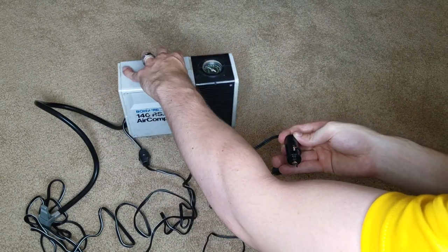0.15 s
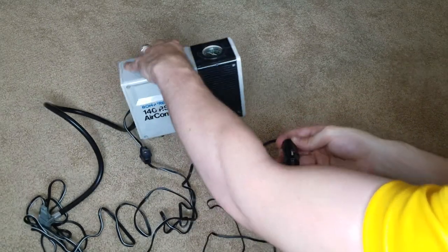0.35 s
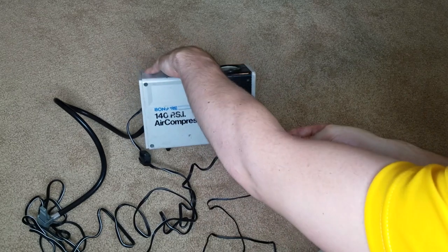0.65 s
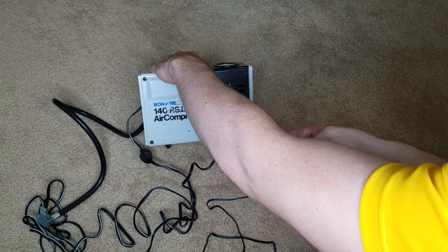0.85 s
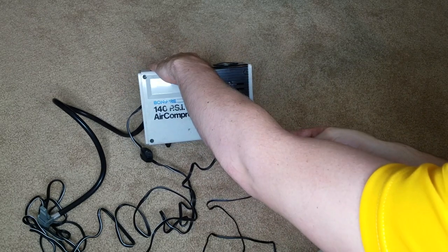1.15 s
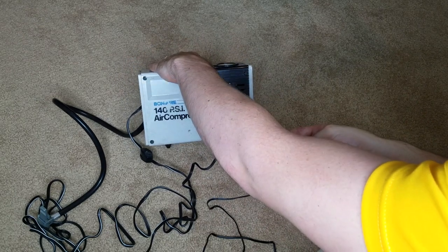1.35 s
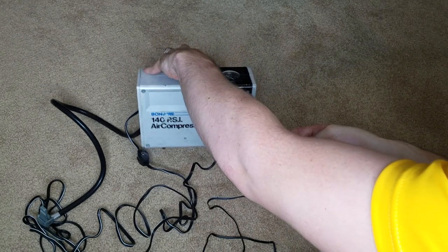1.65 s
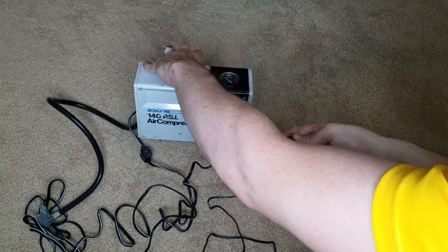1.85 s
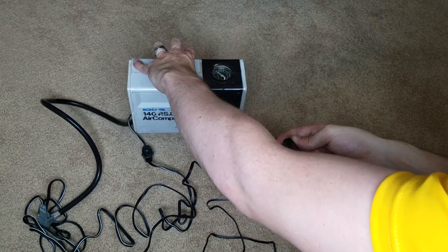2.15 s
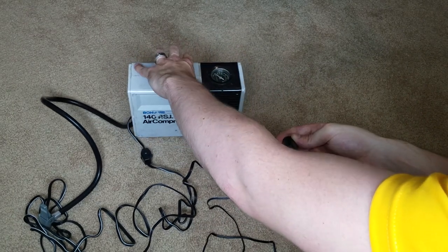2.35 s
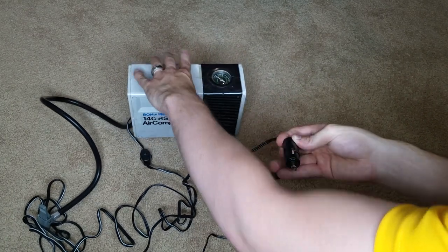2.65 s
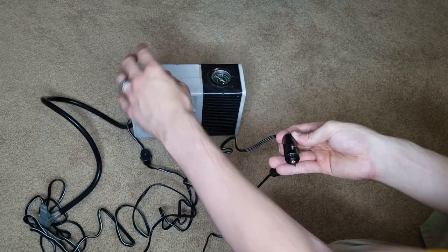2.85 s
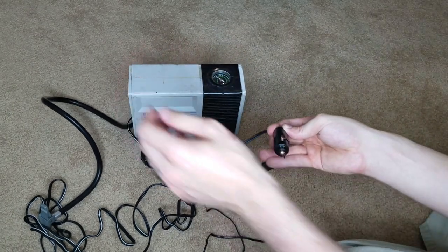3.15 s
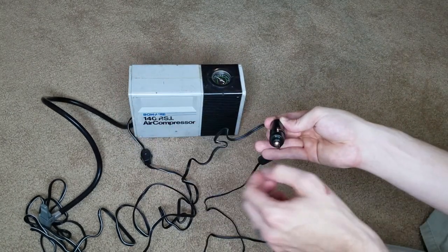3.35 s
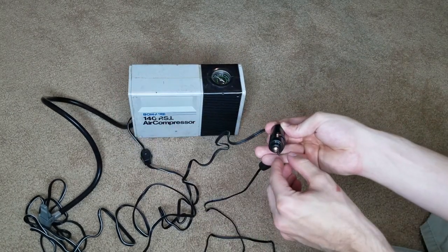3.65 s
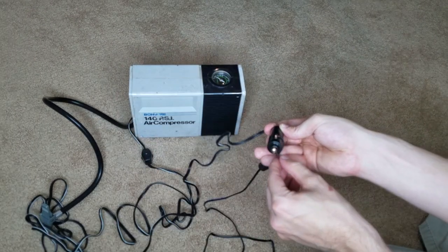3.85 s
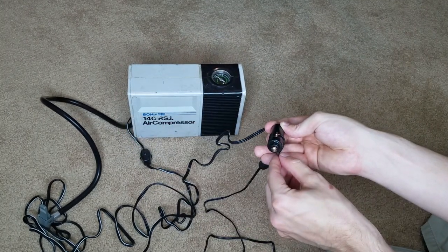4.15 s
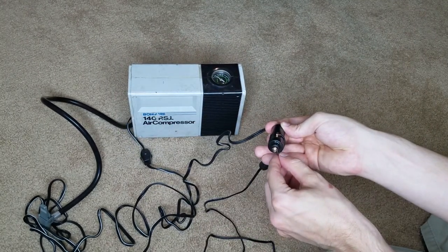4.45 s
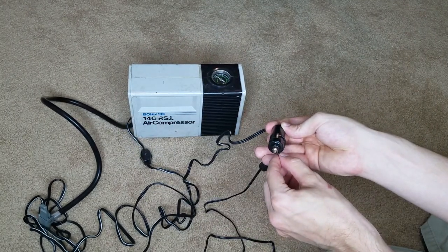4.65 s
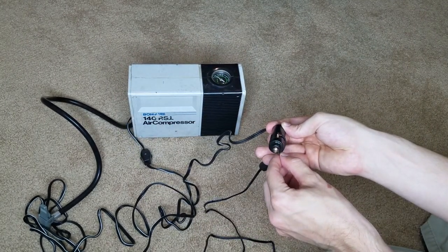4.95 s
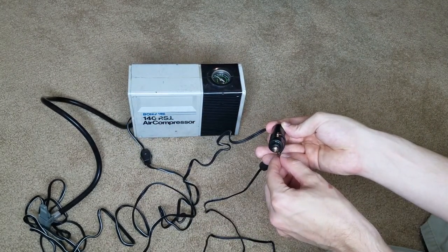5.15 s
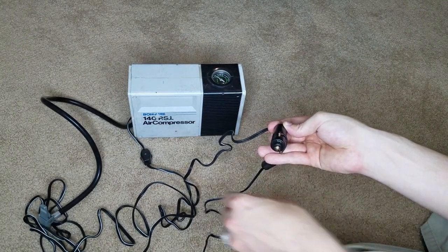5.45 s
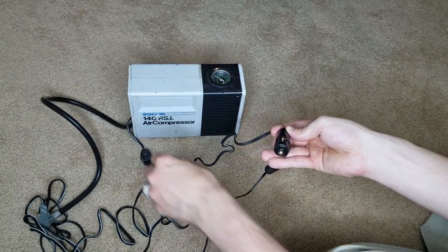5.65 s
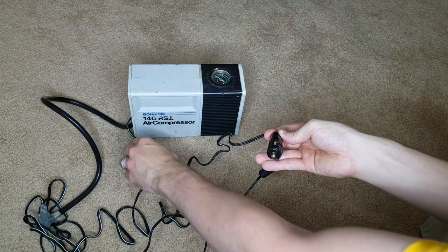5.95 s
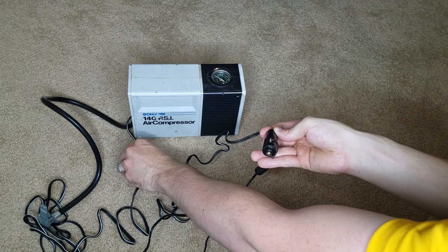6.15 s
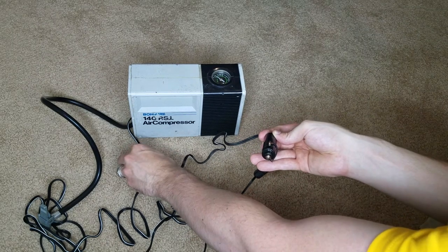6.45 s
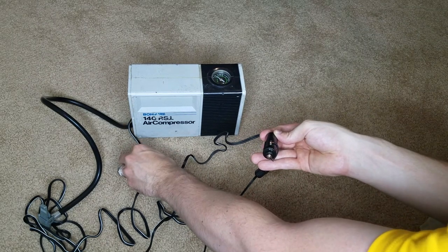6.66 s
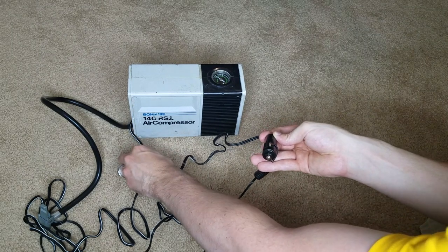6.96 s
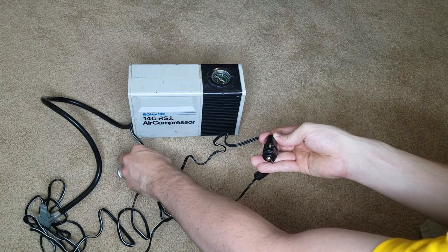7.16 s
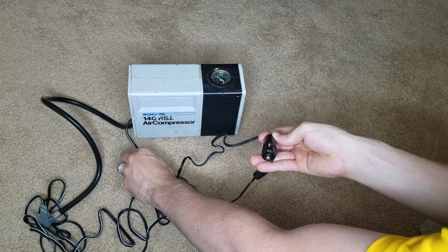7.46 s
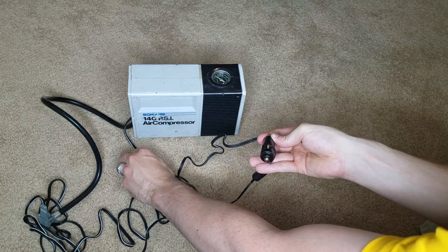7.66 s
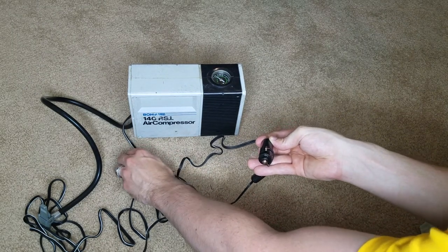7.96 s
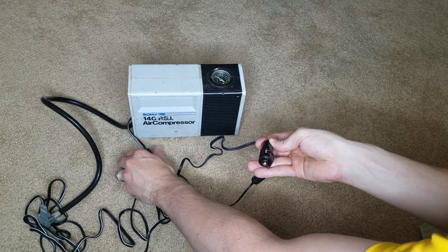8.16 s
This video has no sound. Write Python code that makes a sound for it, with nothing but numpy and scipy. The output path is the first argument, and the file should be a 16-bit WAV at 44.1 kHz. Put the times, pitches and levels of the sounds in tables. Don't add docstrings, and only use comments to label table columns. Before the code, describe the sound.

A small air compressor is switched on for an instant again and again, each burst a rattling, slowing chug over low hum in a carpeted room.

```python
import sys
import numpy as np
from scipy import signal
from scipy.io import wavfile

SR = 44100
rng = np.random.default_rng(int(sys.argv[2]) if len(sys.argv) > 2 else 0)


def generate_wav(sig):
    pcm = np.round(np.clip(np.atleast_2d(sig).T, -1, 1) * 32767).astype(np.int16)
    wavfile.write(sys.argv[1], SR, pcm)


def attenuation_scalar(level_db):
    decades = np.asarray(level_db, float) / 20
    return 10 ** decades


N = 366471


def rms_one(x):
    return x / np.sqrt(np.mean(x ** 2) + 1e-20)


def at_hz(points, hz):
    table_hz, values = np.transpose(points)
    return np.interp(np.log(hz), np.log(table_hz), values)


def drift(rate_hz):
    r = np.exp(-2 * np.pi * rate_hz * 40 / SR)
    settle = 4000
    noise = rng.standard_normal(N // 40 + settle + 2)
    slow = signal.lfilter([1], [1, -2 * r, r * r], noise)[settle:]
    return np.interp(np.arange(N) / 40, np.arange(len(slow)), rms_one(slow - slow.mean()))


def resonate(x, hz, width_hz):
    r = np.exp(-np.pi * width_hz / SR)
    zeros = np.array([1, 0, -1]) * (1 - r * r) / 2
    return signal.lfilter(zeros, [1, -2 * r * np.cos(2 * np.pi * hz / SR), r * r], x)


# (frequency [Hz], left minus right [dB])
BALANCE_DB = [(60, -1.5), (180, -3.5), (550, -0.5), (1650, -1), (4970, 1.5), (15000, 2)]


def spread(pair, hz, likeness):
    alike = np.clip(at_hz(likeness, hz), -1, 1)
    shared = np.sqrt(1 + alike) * pair[0]
    opposed = np.sqrt(1 - alike) * pair[1] * [[1], [-1]]
    return (shared + opposed) * attenuation_scalar(at_hz(BALANCE_DB, hz) * np.array([[.5], [-.5]]))


def bands(source, spectrum, likeness, patchy_db, rate_hz):
    first, last = spectrum[0][0], 1.07 * spectrum[-1][0]
    edges = np.geomspace(first, last, int(3 * np.log2(last / first)))
    out = 0
    for k, (low, high) in enumerate(zip(edges, edges[1:])):
        band_pass = signal.butter(2, [low, high], "band", fs=SR, output="sos")
        band = signal.sosfilt(band_pass, source[k % 2])
        hz = np.sqrt(low * high)
        gain = attenuation_scalar(at_hz(spectrum, hz) + patchy_db * drift(rate_hz))
        out = out + gain * spread(band, hz, likeness)
    return out


# (time [s], level [dB])
FAN_LEVEL = [
    (0, -45.5),
    (1.25, -54),
    (1.5, -72),
    (1.95, -45),
    (2.6, -58),
    (3.5, -52),
    (5.8, -53.5),
    (6.9, -49.5),
    (8.31, -50),
]
# (frequency [Hz], width [Hz], level [dB rms])
DUCT_MODES = [
    (57.7, 2.1, -59.5),
    (142.8, 6.7, -53.5),
    (199, 4.8, -56.5),
]
# (frequency [Hz], level [dB per Hz])
ROOM_TONE = [(25, -41), (45, -18), (70, -15.5), (150, -14), (230, -15), (320, -18), (450, -24.5),
             (1000, -26.5), (2000, -36.5), (4000, -49.5), (7000, -61.5), (9500, -57), (12500, -54.5),
             (15800, -48)]
# (frequency [Hz], left-right likeness [-1 to 1])
FAR_LIKENESS = [(40, 0.91), (180, 1), (320, 0.9), (640, 0.48), (1400, 0.54), (3100, 0.026), (6800, .01)]


def background():
    t = np.arange(N) / SR
    hum = attenuation_scalar(-43 + 0.9 * drift(0.37)) * np.sin(2 * np.pi * 120.4 * t)

    fan_hz = 95.56 + 0.44 * drift(1.14)
    fan_db = np.interp(t, *np.transpose(FAN_LEVEL)) + 2.5 * drift(3.8)
    fan = attenuation_scalar(fan_db) * np.sin(2 * np.pi * np.cumsum(fan_hz) / SR)

    ducts = sum(attenuation_scalar(db) * rms_one(resonate(rng.standard_normal(N), hz, width))
                for hz, width, db in DUCT_MODES)
    hiss = rng.standard_normal((2, 2, N))
    floor = rms_one(bands(hiss, ROOM_TONE, FAR_LIKENESS, patchy_db=1.0, rate_hz=4.3))
    tones = np.sqrt(2) * (hum + fan) + ducts
    return tones * attenuation_scalar([[-.55], [.55]]) + attenuation_scalar(-48.5) * floor


def room(x):
    bass_t60_s, treble_t60_s = 0.33, 0.31
    t = np.arange(SR // 2) / SR
    noise = rng.standard_normal((2, len(t))) * (1 - np.exp(-t / 0.0025))
    long_waves = signal.butter(2, 600, fs=SR, output="sos")
    noise[1] += signal.sosfilt(long_waves, noise[0] - noise[1])
    bass = signal.sosfilt(signal.butter(1, 2500, fs=SR, output="sos"), noise)
    tail = bass * attenuation_scalar(-60 * t / bass_t60_s) + (noise - bass) * attenuation_scalar(-60 * t / treble_t60_s)
    tail = tail / np.sqrt(np.sum(tail ** 2, axis=1, keepdims=True))
    return signal.fftconvolve(x, tail, axes=1)[:, :N]


# (left lag [ms], right lag [ms], level [dB])
ECHOES = [
    (.3, .2, -11),
    (.7, .9, -11),
    (3.6, 2.9, -14),
]


def first_echoes(x):
    out, n = x.copy(), np.arange(N)
    for left_ms, right_ms, db in ECHOES:
        for side, ms in enumerate((left_ms, right_ms)):
            out[side] += attenuation_scalar(db) * np.interp(n - ms * SR / 1000, n, x[side], left=0)
    return out


# (time [s], hold [s], level [dB])
RUSTLE = [
    (2.885, 0.037, -64),
    (5.33, 0.22, -62),
]


def sleeve():
    attack_s, release_s = .025, 0.055
    t, level = np.arange(N) / SR, np.zeros(N)
    for s, hold_s, db in RUSTLE:
        corners = np.cumsum([s, attack_s, hold_s, release_s])
        level += attenuation_scalar(db) * np.interp(t, corners, [0, 1, 1, 0])
    soft = signal.butter(1, 7000, fs=SR, output="sos")
    return level * signal.sosfilt(soft, rng.standard_normal((2, N)))


# (time [s], crack peak [dB], knock [dB], t60 [s])
CLICKS = [
    (0.62, -35, -62, 0.055),
    (1.3825, -42, -54, 0.079),
    (2.372, -41, -56, 0.048),
    (2.818, -50, -76, 0.048),
    (8.043, -36.5, -61, 0.071),
    (8.0694, -42, -44.5, 0.055),
    (8.0889, -41, -74, 0.067),
    (8.2865, -60, -71, 0.043),
]


def fingers():
    crack, knock = np.zeros(N), np.zeros(N)
    for s, crack_db, knock_db, t60 in CLICKS:
        start = round(s * SR)
        t = np.arange(min(SR // 10, N - start)) / SR
        fall = attenuation_scalar(-60 * t / max(t60, .005))
        onset = 1 - np.exp(-t / 0.0004)
        crack[start:start + len(t)] += attenuation_scalar(crack_db - 21.0) * fall * onset
        knock[start:start + len(t)] += attenuation_scalar(knock_db + 25.0) * fall
    bright = signal.butter(2, 2500, "high", fs=SR, output="sos")
    cracks = crack * rng.standard_normal((2, N))
    thud = resonate(resonate(knock * rng.standard_normal(N) + 1e-18, 520, 300), 560, 300)
    return signal.sosfilt(bright, cracks + attenuation_scalar(-3.5) * sleeve()) + thud


# (hardest stroke [s], crank speed there [turns/s], first stroke before it [ms], switch-on before that [ms])
KICKS = [
    (-.111, 22.15, 48, 20),
    (.7429, 23.3, 40.5, 8),
    (1.6284, 21.0, 49.3, 24),
    (2.4705, 21.76, 49.2, 15),
    (3.3198, 23.5, 34.7, 19.6),
    (4.2035, 20.7, 50.5, 31.5),
    (5.048, 21.8, 45.2, 26),
    (5.8888, 23.0, 32.8, 21),
    (6.774, 20.7, 47, 43),
    (7.616, 21.64, 49.7, 25.7),
]
# (switch-on jolt [dB], first stroke [dB], hardest stroke [dB])
KICK_DB = [(-50, -36, -27.5), (-51, -43.5, -28), (-51, -30, -27.5), (-49, -36, -27.5), (-47, -36, -27),
           (-52.5, -31, -27.5), (-43.5, -35, -27), (-50.5, -34.5, -26.5), (-56, -30, -27.5),
           (-50, -34, -26.5)]
# (time [s], level [dB])
KNOCKS = [
    (0.9454, -73),
    (0.9708, -49),
    (1.014, -66),
    (3.5455, -46),
    (3.5782, -62),
    (4.1786, -38),
    (6.119, -52.5),
    (6.703, -52),
    (7.59, -39),
]
# (gear re air [dB], case re air [dB], rise [ms], t60 [s])
JOLT = (0.5, 0, 2, 0.08)
FIRST = (-0.5, 0, 10, 0.23)
HARDEST = (-0.5, -0.44, 8, 0.1878)
COAST = (-1, -2, 5, 0.1727)
LOOSE = (3, 3.5, -11.5, 0.0253)


def strokes():
    drag = 76
    gear_share, case_share = 0.14, 0.34
    rows = [(s, db, -30, LOOSE) for s, db in KNOCKS]
    for (s, speed, first_ms, run_up_ms), (jolt_db, first_db, full_db) in zip(KICKS, KICK_DB):
        first_s = s - first_ms / 1000
        jolt_s = s - (first_ms + run_up_ms + 3) / 1000
        rows += [(jolt_s, jolt_db, full_db, JOLT),
                 (first_s, first_db, full_db, FIRST),
                 (s, full_db, full_db, HARDEST)]
        for turn in (1, 2, 3):
            slowed = np.sqrt(max(speed ** 2 - 2 * drag * turn, .25))
            coast_db = full_db - 2.5 + 26 * np.log10(slowed / speed)
            rows += [(s + (speed - slowed) / drag, coast_db, full_db, COAST)]
    out = []
    for s, db, full_db, (gear_db, case_db, rise_ms, t60) in rows:
        weaker_db = full_db - db
        if s > -.1:
            out.append((s, db, gear_db + gear_share * weaker_db, case_db + case_share * weaker_db,
                        rise_ms, t60))
    return out


def effort(level_db, slower, blow_db):
    power, blows = np.zeros(N), np.zeros(N)
    for (s, _, _, _, rise_ms, t60), db in zip(strokes(), level_db):
        rise_s = max(rise_ms, .5) * slower / 1000
        start = max(round((s - 1.68 * rise_s) * SR), 0)
        t = np.arange(min(SR // 3, N - start)) / SR + max(1.3 * rise_s - s, 0)
        swell = 1 - np.exp(-(t / rise_s / 2) ** 2)
        fall = attenuation_scalar(db - 60 * t / (max(t60, .02) * slower))
        power[start:start + len(t)] += (swell * fall) ** 2
        blows[max(round((s + .002) * SR), 0)] = attenuation_scalar(db + blow_db) * (s > 0)
    clatter = signal.lfilter([attenuation_scalar(-21.0)], [1, -attenuation_scalar(-60 / (.06 * SR))], blows + 1e-18)
    return np.sqrt(power + clatter ** 2), blows


def teeth(per_s, uneven_db):
    sizes = attenuation_scalar(uneven_db * np.minimum(rng.exponential(1, (2, N)), 5))
    signs = rng.choice([-1, 1], (2, N))
    hits = rng.random((2, N)) < per_s / SR
    return rms_one(sizes * signs * hits) + 1e-9


# (time [s], grip [0-1])
GRIP = [
    (0, 0.2),
    (.85, .99),
    (1.7, 0.56),
    (2.55, 0.6),
    (3.2, 0.34),
    (8.31, 0.14),
]
# (frequency [Hz], left-right likeness [-1 to 1])
NEAR_LIKENESS = [(150, 1), (400, 1), (1000, 0.57), (3000, 0.19), (8000, -0.11), (15000, -0.34)]


def body(knocks, modes, patchy_db):
    grip = np.interp(np.arange(N) / SR, *np.transpose(GRIP))
    out = 0
    for k, (hz, width, db, held_db) in enumerate(modes):
        gain = attenuation_scalar(db + held_db * grip + patchy_db * drift(13.4)) / np.sqrt(width)
        ring = spread(resonate(knocks, hz, width), hz, NEAR_LIKENESS)
        out = out + (-1) ** k * gain * ring
    return out


# (frequency [Hz], width [Hz], level [dB], change under a gripping hand [dB])
CASE_MODES = [(179, 40, -9.5, 5.5), (258.3, 31, -10.5, 9), (338.3, 22, -4.5, 2), (425.4, 13.6, -2.5, 8),
              (479, 29, 2, -2.5), (529, 23, 5.5, -4), (577.6, 42, 5, 0), (663, 59, 4, -1.5),
              (750, 27, -1, 0.5), (838, 91, -5.5, 2)]


def case_boom():
    _, air_db, _, case_db, _, _ = np.transpose(strokes())
    push, blows = effort(air_db + case_db + 31.0, slower=1.45, blow_db=16.0)
    knocks = push * teeth(per_s=450, uneven_db=3.0) + blows * [[1], [.4]]
    return body(knocks, CASE_MODES, patchy_db=1.25)


# (frequency [Hz], width [Hz], level [dB], change under a gripping hand [dB])
GEAR_MODES = [(1040, 230, -13.5, 19), (1237, 110, -2, -0.5), (1312, 66, 6, -5), (1613, 75, -3, 2.5),
              (2109, 91, -1, 5.5), (2643, 125, -1, 2.5), (2840, 35, -10.5, -3), (3477, 100, -12, -27),
              (3914, 68, -5.5, -8.5), (4220, 46, -12, -21), (4800, 52, -25, -1), (5260, 91, -11, -5)]
# (frequency [Hz], level [dB per Hz])
GRIND = [(800, -15), (1100, -3), (1500, -2), (2000, -2), (2700, -9), (3300, -17), (4200, -17), (5600, -34)]


def gears():
    _, air_db, gear_db, _, _, _ = np.transpose(strokes())
    push, blows = effort(air_db + gear_db, slower=1.23, blow_db=14.5)
    knocks = teeth(per_s=1800, uneven_db=5.0)
    rattle = attenuation_scalar(31.0) * body(push * knocks + blows * [[1], [.4]], GEAR_MODES, patchy_db=2.0)
    rubbing = [knocks + 1.3 * rng.standard_normal((2, N)), teeth(per_s=6100, uneven_db=0.0)]
    grind = rms_one(bands(rubbing, GRIND, NEAR_LIKENESS, patchy_db=2.5, rate_hz=27.0))
    return rattle + attenuation_scalar(-3.5) * push * grind


# (frequency [Hz], level [dB per Hz])
AIR = [(2650, -23), (4500, 5), (5350, -3), (6030, -4.5), (6980, 5.5), (8000, -5.5), (11600, -7),
       (15700, -3)]


def valve_air():
    _, air_db, _, _, _, _ = np.transpose(strokes())
    push, _ = effort(air_db - 5.5, slower=1.0, blow_db=1.0)
    gritty = [teeth(per_s=9000, uneven_db=-1.0), teeth(per_s=9000, uneven_db=2.0)]
    return push * rms_one(bands(gritty, AIR, NEAR_LIKENESS, patchy_db=3.0, rate_hz=38))


def thumps():
    _, air_db, gear_db, _, _, _ = np.transpose(strokes())
    _, blows = effort(air_db + gear_db, slower=1, blow_db=3)
    pulse = signal.butter(1, [300, 2600], "band", fs=SR, output="sos")
    return -signal.sosfilt(pulse, blows + 1e-18)


def compressor():
    chatter = attenuation_scalar(1.4 * drift(75))
    return (case_boom() + gears() + valve_air()) * chatter + thumps()


def scene():
    near = attenuation_scalar(0.5) * first_echoes(compressor() + fingers())
    return near + attenuation_scalar(-5.5) * room(near) + background()


def band_limit(x):
    return signal.sosfilt(signal.butter(12, 15840, fs=SR, output="sos"), x)


def record(dry):
    n, port_lag_s = np.arange(N), -4.5e-5
    right = np.interp(n + round(port_lag_s * SR), n, dry[1])
    steep = signal.ellip(10, .5, 70, 15800, fs=SR, output="sos")
    mix = signal.sosfilt(steep, np.array([dry[0], right]))
    return band_limit(mix)


dry = scene()
out = record(dry)
generate_wav(out)
```